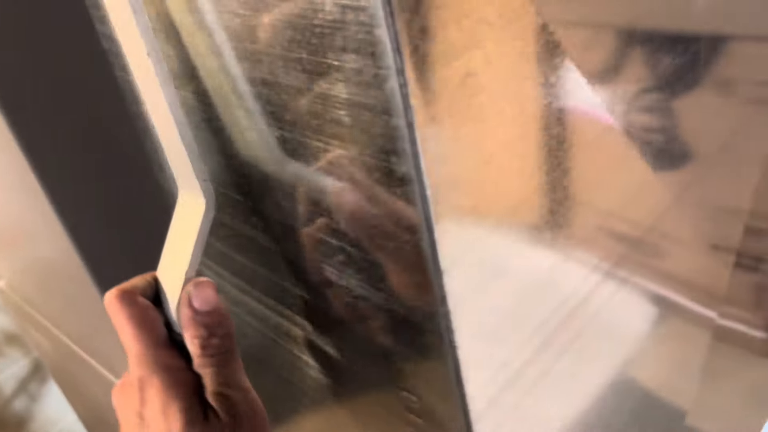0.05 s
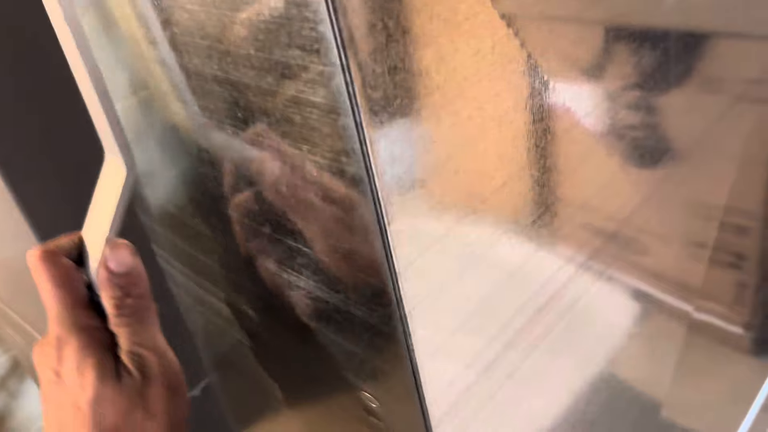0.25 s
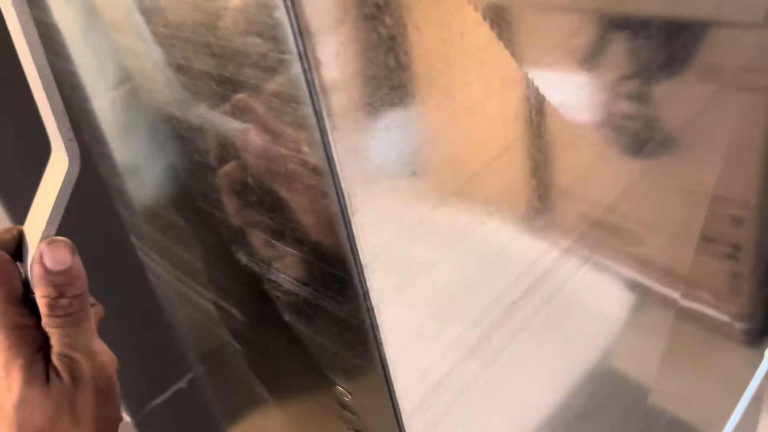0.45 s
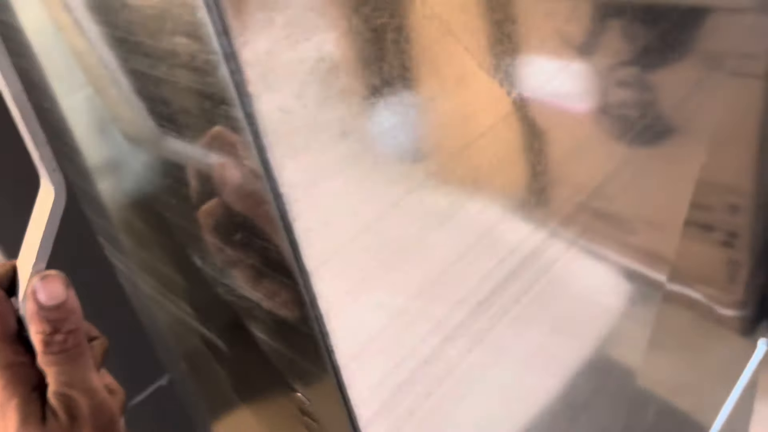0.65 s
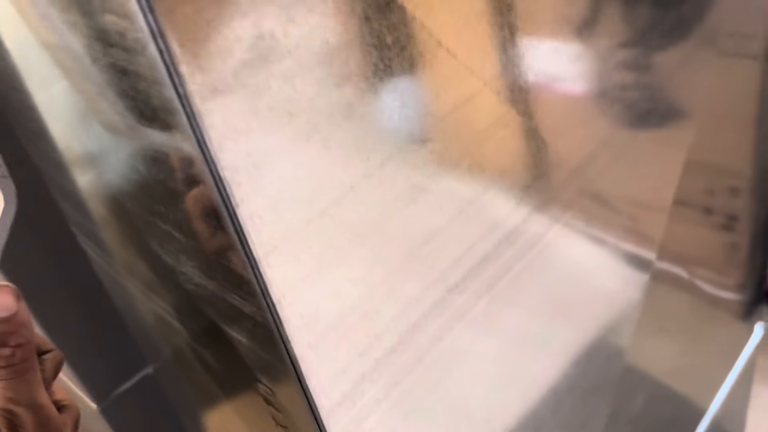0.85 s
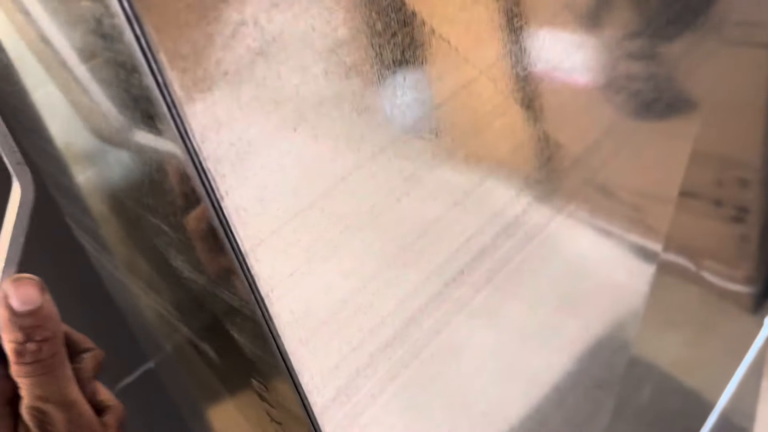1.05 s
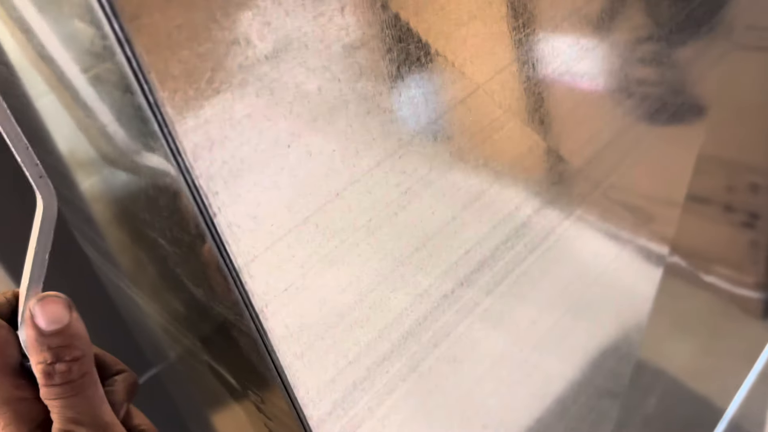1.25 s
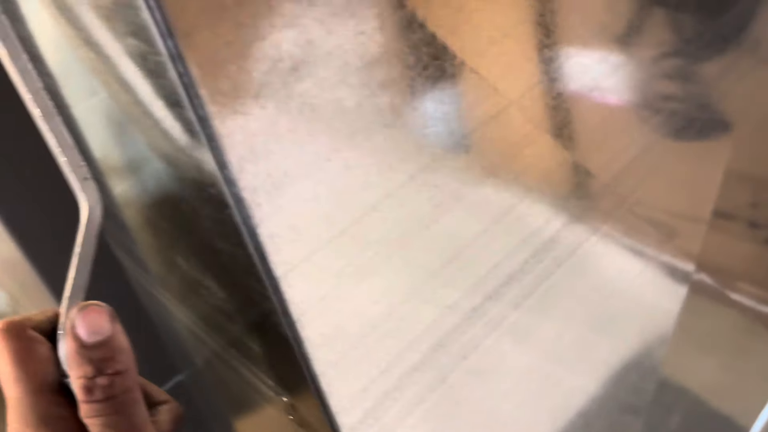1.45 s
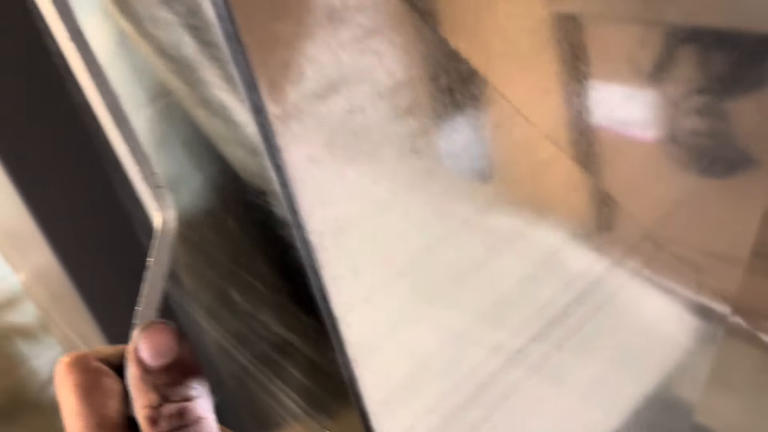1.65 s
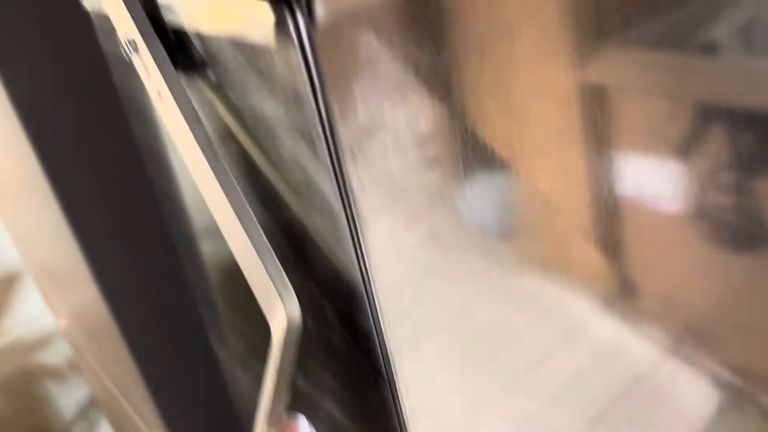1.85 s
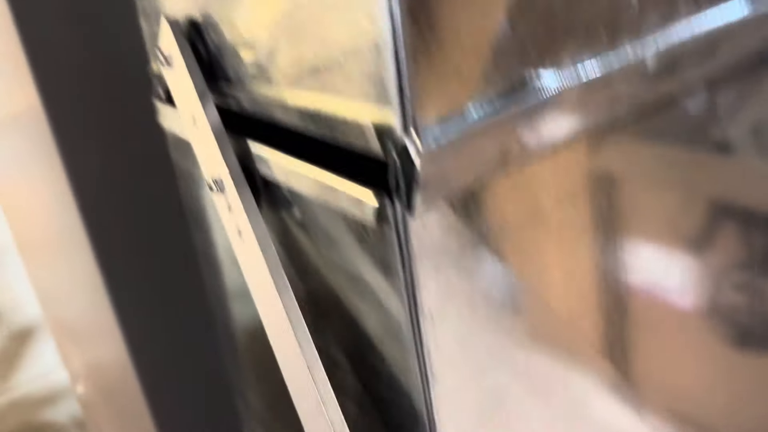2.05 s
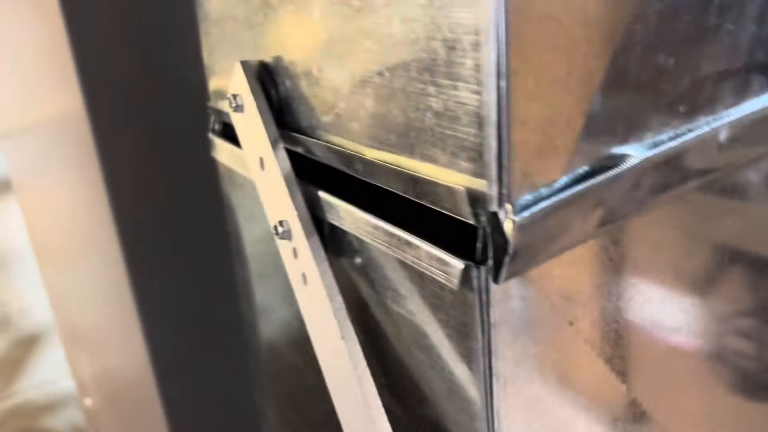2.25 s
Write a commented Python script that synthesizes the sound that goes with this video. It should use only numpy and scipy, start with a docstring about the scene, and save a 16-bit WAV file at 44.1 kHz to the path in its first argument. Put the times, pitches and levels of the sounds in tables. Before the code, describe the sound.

Close handling of thin metal ducting indoors: light scraping and a knock, a rapid burst of clattering hits with hollow ringing, quieter taps, one more hard clank, then fading resonance and small joint clicks over low rumble.

```python
"""Sheet-metal duct knocked together

Pieces of sheet-metal duct are slid and knocked together close to two microphone ports in a work room.
Each knock is noise on dense sheet modes: the treble starts at once, the boom swells late.
Shaped noise makes floor, panel rumble, scraping edge and swelling bands; decaying sines make the
pings, ringing modes and joint ticks, most of them near the end. A noisy tail makes the room."""
import sys
import numpy as np
from scipy import signal
from scipy.fft import rfft, irfft, next_fast_len
from scipy.io import wavfile
from scipy.ndimage import uniform_filter1d

SR = 44100
rng = np.random.default_rng(int(sys.argv[2]) if len(sys.argv) > 2 else 0)


def wav_out(sig):
    """Save sig, one row per channel (or a flat mono array), as 16-bit PCM at SR to the path in sys.argv[1]."""
    wavfile.write(sys.argv[1], SR, np.round(np.clip(np.atleast_2d(sig).T, -1, 1) * 32767).astype(np.int16))


N = 101430


def gain_of(db):
    """Amplitude factor of a level in dB."""
    return 10 ** (np.asarray(db) / 20)


def evened(x):
    """Scale to unit rms."""
    return x / np.sqrt(np.mean(x ** 2) + 1e-20)


def read(points, hz):
    """Interpolate a curve over log frequency."""
    f, value = np.transpose(points)
    return np.interp(np.log(hz + 1), np.log(f + 1), value)


def along(points):
    """Interpolate a curve over the time of the scene."""
    s, value = np.transpose(points)
    return np.interp(np.arange(N) / SR, s, value)


def add(mix, s, sound):
    """Add a sound in place at s seconds, cut at the end of the mix."""
    part = mix[..., max(round(s * SR), 0):][..., :sound.shape[-1]]
    part += sound[..., :part.shape[-1]]


def coloured(x, points):
    """Filter by a dB curve over frequency, then scale to unit rms."""
    hz = np.fft.rfftfreq(x.shape[-1], 1 / SR)
    return evened(irfft(rfft(x) * gain_of(read(points, hz)), x.shape[-1]))


# Floor spectrum. Each row: frequency in Hz, relative density in dB per Hz.
FLOOR_COLOUR = [(22, -43), (50, -3), (120, 2.5), (500, -14.5), (1500, -21), (4000, -36.5), (9000, -42.5),
                (13500, -51), (16000, -85)]
FLOOR_DB = -52


def floor():
    """Steady coloured noise, independent in the two fields."""
    return gain_of(FLOOR_DB) * coloured(rng.standard_normal((2, N)), FLOOR_COLOUR)


# Room decay. Each row: frequency in Hz, t60 in seconds.
ROOM_T60_S = [(100, 1.3), (1000, 0.23), (4000, 0.9), (12000, 0.81)]
ROOM_DB, ROOM_RISE_S = -17.5, 0.0037


def room(x):
    """Convolve the shared field with a noisy tail whose bands die at their own speed."""
    hz, t, z = signal.stft(rng.standard_normal((2, SR)), SR, nperseg=256)
    decay = gain_of(-60 * t / read(ROOM_T60_S, hz)[:, None])
    tail = signal.istft(z * decay, SR, nperseg=256)[1]
    tail = tail * np.clip(np.arange(tail.shape[1]) / SR / ROOM_RISE_S, 0, 1)
    tail = tail / np.linalg.norm(tail[0])
    return gain_of(ROOM_DB) * signal.fftconvolve(x[:1], tail, axes=1)[:, :N]


# Handling rumble. Each row: time in seconds, level in dB.
RUMBLE_LEVEL_DB = [(0.0, -41.5), (0.09, -45), (0.67, -43), (0.9, -33), (0.96, -43.5), (1.26, -44.5),
                   (1.56, -49.5), (1.79, -49), (1.95, -42), (2.22, -49), (2.3, -48.5)]
# Rumble spectrum. Each row: frequency in Hz, relative density in dB per Hz.
RUMBLE_COLOUR = [(20, -44), (45, -3.5), (90, -5.5), (172, -3.5), (234, -13), (357, -18), (495, -14),
                 (787, -29.5), (1230, -29.5), (2500, -48), (5000, -67)]


def rumble():
    """Loose panels wobble and boom under the hands: low noise with a moving level."""
    return gain_of(along(RUMBLE_LEVEL_DB)) * coloured(rng.standard_normal((2, N)), RUMBLE_COLOUR)


# Panel bands. Each one holds: centre in Hz, half-amplitude width in Hz.
DRONE_BAND_HZ = (169, 13.7)
PANEL_BAND_HZ = (473, 220)
SQUEAK_BAND_HZ = (1875, 300)
# Their swells. Each row: time in seconds, level in dB.
DRONE_LEVEL_DB = [(.12, -82), (0.202, -32.5), (.4, -44), (.47, -70), (.52, -49), (.57, -35.5), (.66, -45),
                  (.75, -54)]
PANEL_LEVEL_DB = [(.15, -96), (.24, -46.5), (.42, -48), (0.499, -61), (.6, -87)]
SQUEAK_LEVEL_DB = [(2.001, -80), (2.08, -70.5), (2.2, -60.5), (2.23, -59.5), (2.25, -64), (2.3, -73)]


def hum(band_hz, level_db):
    """Noise through one panel resonance."""
    centre_hz, width_hz = band_hz
    hz = np.fft.rfftfreq(N, 1 / SR)
    resonance = 1 / (1 + (2 * (hz - centre_hz) / width_hz) ** 2)
    noise = irfft(rfft(rng.standard_normal((2, N))) * resonance, N)
    return gain_of(along(level_db)) * evened(noise)


def hums():
    """Three narrow bands swell as the panels slide or shudder."""
    out = hum(DRONE_BAND_HZ, DRONE_LEVEL_DB)
    out += hum(PANEL_BAND_HZ, PANEL_LEVEL_DB)
    return out + hum(SQUEAK_BAND_HZ, SQUEAK_LEVEL_DB)


# Scraping edge. Each row: time in seconds, level in dB.
SCRAPE_LEVEL_DB = [(0, -59), (.05, -62), (.1, -64.5), (.115, -57.5), (.25, -46.5), (.31, -51.5),
                   (.39, -45.5), (.43, -69), (.5, -66), (1.05, -61.5), (1.12, -54.5), (1.24, -60.5),
                   (1.3, -67.5), (1.7, -69.5), (1.75, -53), (1.8, -73), (1.97, -60), (2.05, -97),
                   (2.2, -64), (2.3, -68)]
# Scrape spectrum. Each row: frequency in Hz, relative density in dB per Hz.
SCRAPE_COLOUR = [(300, 1.5), (900, 4.5), (2000, -5.5), (4000, -3.5), (7000, -11.5), (12500, -16),
                 (15000, -18)]
SLIPS_PER_S, GRIT_DB, PATCH_DB = 5000, 1.5, 1.5  # GRIT_DB: scale of the exponential spread of slip size


def scrape():
    """Dense grit of tiny slips, a few of them larger; its colour drifts in patches."""
    size = gain_of(GRIT_DB * np.minimum(rng.exponential(1, (2, N)), 5))
    slips = size * (rng.random((2, N)) < SLIPS_PER_S / SR) * rng.choice([-1., 1.], (2, N))
    z = signal.stft(slips, nperseg=256)[2]
    patches = uniform_filter1d(rng.standard_normal(z.shape[1:]), size=6, axis=0)
    patches = evened(uniform_filter1d(patches, size=14, axis=1))
    grit = signal.istft(z * gain_of(PATCH_DB * patches), nperseg=256)[1][:, :N]
    return gain_of(along(SCRAPE_LEVEL_DB)) * coloured(grit, SCRAPE_COLOUR)


# Joint slips. Each row: start in seconds, level in dB.
TICKS = [(1.6882, -55.5), (2.0434, -67), (2.0864, -67), (2.102, -61), (2.1326, -58.5), (2.1543, -56.5),
         (2.1694, -60), (2.1824, -56), (2.1934, -60), (2.2069, -58), (2.2225, -57), (2.2454, -55),
         (2.269, -56)]
# Joint modes. Each row: nominal frequency in Hz, level in dB re tick, t60 in seconds.
TICK_MODES = [(2010, -7, 0.0094), (4050, -1.5, 0.0093), (6300, -5, .006), (7700, 0, 0.006),
              (10900, -5, 0.007)]


def ticks():
    """A joint slips; each slip rings a few very short modes, slightly retuned."""
    out, t = np.zeros((2, N)), np.arange(1500) / SR
    for s, tick_db in TICKS:
        tick = np.zeros(len(t))
        for hz, mode_db, t60_s in TICK_MODES:
            tune = rng.uniform(0.93, 1.02)
            tick += gain_of(tick_db + mode_db - 60 * t / t60_s) * np.sin(2 * np.pi * hz * tune * t)
        add(out[0], s, tick)
    return out


# Folded edges. Each row: start in seconds, frequency in Hz, level in dB of the stronger mode.
PINGS = [(0.54, 5600, -32.5), (0.54, 4070, -40), (.535, 4870, -34.5), (0.61, 3816, -35),
         (0.602, 10700, -33), (0.69, 6600, -28.5), (0.68, 8130, -27), (.679, 13000, -34),
         (.695, 13360, -26), (.703, 3596, -24.5), (.750, 3605, -30.5), (.755, 4800, -35.5),
         (1.362, 5150, -41), (1.357, 3100, -43), (1.385, 2900, -47.5), (1.5, 1230, -41), (1.097, 2750, -43),
         (1.367, 4400, -44), (1.765, 6500, -31.5), (1.766, 8340, -40), (1.765, 4830, -34),
         (1.765, 2700, -35.5), (1.791, 3600, -32), (1.809, 3650, -36.5)]
PING_T60_S, PING_HZ = 0.05, 4000  # t60 at that pitch; lower pings last longer
PING_SPLIT, PING_RISE_S = 0.016, 0.0013


def pings():
    """Folded edges ping at a contact: a close pair of modes that dies fast."""
    out, t = np.zeros((2, N)), np.arange(8000) / SR
    for s, hz, db in PINGS:
        phase_turns, side = rng.random(), rng.uniform(-1, 1)
        pair = np.sin(2 * np.pi * hz * t)
        pair += .5 * np.sin(2 * np.pi * (hz * (1 + PING_SPLIT) * t + phase_turns))
        decay = gain_of(db - 60 * t / PING_T60_S * np.sqrt(hz / PING_HZ))
        add(out, s, np.outer([1, side], decay * np.minimum(t / PING_RISE_S, 1) * pair))
    return out


BOOM_HZ, SIZZLE_HZ = 644, 7430  # boom lies below, sizzle above
# Standing-out modes. Each row: nominal Hz, dB before the strike offset, t60 in seconds, beats per second.
RING_MODES = [(102, -18.5, 0.7, 6.3), (183, -23, 0.7, 11.5), (245, -27, .4, 6), (328, -27, 0.98, 4.7),
              (409, -29, .9, 5.5), (490, -26, 0.69, 7), (540, -29, .6, 8), (598, -28, 0.3, 10),
              (1873, -37, 0.42, 9), (13430, -45, 0.6, 23)]
# Knocks that excite them; a panel held otherwise is tuned otherwise.
# Each row: start in seconds, offset of modes below BOOM_HZ in dB, of the others in dB, pitch factor.
RING_STRIKES = [(.695, -2, 0, 1), (1.361, -24, -39, 1.1), (1.769, -10, -20, 1.1)]
RING_RISE_S = .03  # up to 300 Hz, shorter above
BEAT_DEPTH, BEAT_FADE_S = .55, .3


def ringing():
    """Modes that stand out after a hard knock: sines whose beating fades."""
    out, t = np.zeros((2, N)), np.arange(32768) / SR
    for s, bass_db, treble_db, tune in RING_STRIKES:
        for hz, db, t60_s, beats in RING_MODES:
            rise = 1 - np.exp(-t / (RING_RISE_S * min(300 / hz, 1)))
            beat = 1 - BEAT_DEPTH * np.exp(-t / BEAT_FADE_S) * np.cos(2 * np.pi * beats * t)
            level = gain_of(db + (bass_db if hz < BOOM_HZ else treble_db) - 60 * t / t60_s)
            tone = np.sin(2 * np.pi * (hz * tune * t + rng.random()))
            add(out[0], s, beat * rise * level * tone)
    return out


# Dense sheet modes. Each row: frequency in Hz, relative density in dB per Hz.
SHEET_COLOUR = [(25, -56), (45, -15.5), (65, 3.5), (110, 4.5), (200, -0.5), (450, 3.5), (750, -2.5),
                (1400, -6.5), (3500, -8.5), (6500, -13.5), (9000, -11), (13500, -19), (16000, -16.5)]
MODE_SPREAD_DB, CLUMP_HZ, CLUMP_DB, SPOT_OCTAVES = 3., 150, 2.5, 0.3
USUAL_SIZZLE_DB = -16.5  # sizzle of the plain sheet colour


def mode_spectrum(modes, hz, boom_db, sizzle_db, spot_hz, spot_db):
    """Random strength and phase per mode and field; treble at unit rms, then boom and sizzle weights."""
    real, imag, spread = rng.standard_normal((3, 2, len(hz)))
    clumps = evened(uniform_filter1d(rng.standard_normal(len(hz)), round(CLUMP_HZ / hz[1])))
    shape_db = read(SHEET_COLOUR, hz) + (MODE_SPREAD_DB * spread + CLUMP_DB * clumps) * (hz > BOOM_HZ)
    shape_db += spot_db * np.exp(-(np.log2((hz + 1) / spot_hz) / SPOT_OCTAVES) ** 2)
    z = modes * gain_of(shape_db) * (real + 1j * imag)
    z /= np.sqrt(np.mean(irfft(z * (hz > 1500)) ** 2))
    tilt_db = boom_db / (1 + (hz / BOOM_HZ) ** 3)
    tilt_db += (sizzle_db - USUAL_SIZZLE_DB) / (1 + (SIZZLE_HZ / (hz + 1)) ** 6)
    return z * gain_of(tilt_db)


# Sheet decay. Each row: frequency in Hz, t60 in seconds.
SHEET_T60_S = [(60, 2.2), (160, 2.07), (420, 0.66), (1100, 0.59), (2900, 0.27), (7700, 0.2), (14000, 0.16)]
# Sheet rise. Each row: frequency in Hz, time constant in seconds at swell factor 1.
SHEET_RISE_S = [(60, 0.031), (250, 0.045), (800, 0.0083), (2500, 0.009), (8000, 0.00081)]
CREST_DB = 8.5  # fixed step from the nominal clang peak down to the rms level
CRACK_DB, CRACK_S = 3, 0.0016
RATTLE_DB, RATTLE_S, RATTLE_START_S = 2.3, .003, .02


def knock(modes, db, boom_db, sizzle_db, spot_hz, spot_db, swell):
    """Each band swells and dies at its own speed; the treble adds a crack at once and rattles."""
    size = 2 * (len(modes) - 1)
    hz, t = np.fft.rfftfreq(size, 1 / SR), np.arange(size) / SR
    z = mode_spectrum(modes, hz, boom_db, sizzle_db, spot_hz, spot_db)
    flutter = evened(uniform_filter1d(rng.standard_normal(size), round(RATTLE_S * SR)))
    rattle = gain_of(RATTLE_DB * np.minimum(t / RATTLE_START_S, 1) * flutter)
    centres, out = np.geomspace(50, 14000, 10), 0
    step = np.log(centres[1] / centres[0])
    for f in centres:
        share = np.clip(1 - abs(np.log(np.clip(hz, 50, 14000) / f)) / step, 0, 1)
        rise = 1 - np.exp(-t / (swell * read(SHEET_RISE_S, f) + 1e-4))
        tail = rise * gain_of(-60 * t / read(SHEET_T60_S, f))
        if f > 1000:
            tail = tail * rattle + gain_of(CRACK_DB) * np.exp(-t / CRACK_S)
        out = out + irfft(z * share) * tail
    return gain_of(db - CREST_DB) * out * np.minimum((t[-1] - t) / 0.15, 1)


# Knocks. Each row: start in seconds, nominal clang peak in dB, boom shift in dB, sizzle in dB,
# bright spot in Hz, its lift in dB, swell factor on the rise times.
KNOCKS = [(0.1108, -51, 8, 2, 4850, 22, 1), (0.3301, -29, -8, -36, 1290, 3, 0.4),
          (0.5152, -43.5, 3.5, -15, 1000, -3, 1), (0.532, -38, -2.5, -4, 4930, 9, 0.48),
          (0.5354, -28.5, -6, -18.5, 2500, -3, 0.36), (0.601, -24.5, -7, -15, 3900, 5.5, 1),
          (0.6777, -17.5, -8, -24.5, 7800, 7.5, 0.66), (0.6948, -18.5, -5, -16, 13700, 1, 0.67),
          (0.7111, -22.5, -6.5, -23, 1870, -7, 0.73), (0.7503, -25, 2.5, -27, 3720, 0, 1),
          (1.0874, -36, -8, -63, 1340, 7, 0.41), (1.093, -35.5, -5, -51, 1350, 0, 0.42),
          (1.3545, -35, -3.5, -17, 3100, 5.5, 0.95), (1.3626, -32.5, -6, -29, 4650, 6.5, 1),
          (1.7529, -33.5, 7.5, -20, 5010, 5, 1), (1.7657, -20, -11.5, -26, 2900, -1.5, 0.29),
          (1.7851, -23.5, -9.5, -20, 1110, 6.5, 0.27)]
MODE_GAP_HZ = 10  # mean spacing


def knocks():
    """All knocks share one dense set of mode frequencies."""
    size = 32768
    modes = rng.random(size // 2 + 1) < SR / size / MODE_GAP_HZ
    modes[:300] = True  # every bin below about 400 Hz
    out = np.zeros((2, N))
    for s, *row in KNOCKS:
        add(out, s, knock(modes, *row))
    return out


def scene():
    """Two sound fields: one that both ports share, one that differs between them."""
    near = hums() + scrape() + ticks() + pings() + ringing() + knocks()
    return floor() + room(near) + rumble() + near


# Likeness of the ports. Each row: frequency in Hz, likeness from 0 to 1.
PORT_LIKENESS = [(60, 0.97), (300, .92), (700, 0.61), (1400, 0.19), (3000, 0.46), (5500, 0.55),
                 (6400, 0.96), (16000, 1)]
# Phase between the ports. Each row: frequency in Hz, lead of the left port in radians.
LEFT_LEAD_RAD = [(0, 0), (1400, .5), (3000, .2), (6300, 0), (7300, 0), (9500, -3.0), (10500, -3.25),
                 (12000, -6.2), (13500, -6.35), (14800, -9.2), (16500, -9.4)]
EDGE_HZ = 16500


def record(dry):
    """The ports share part of the field with a phase lead; then the band limit."""
    size = next_fast_len(N + 4096)
    hz, (shared, apart) = np.fft.rfftfreq(size, 1 / SR), rfft(dry, size)
    same = np.clip(read(PORT_LIKENESS, hz), 0, 1)
    f, lead = np.transpose(LEFT_LEAD_RAD)
    turn = np.exp(.5j * np.interp(hz, f, lead))
    shared, apart = shared * np.sqrt((1 + same) / 2), apart * np.sqrt((1 - same) / 2)
    ports = irfft(np.array([(shared + apart) * turn, (shared - apart) / turn]), size)[:, :N]
    low_pass = signal.firwin(511, EDGE_HZ, window=("kaiser", 9), fs=SR)
    return signal.oaconvolve(ports, low_pass[None], "same")


dry = scene()
out = record(dry)
wav_out(out)
```